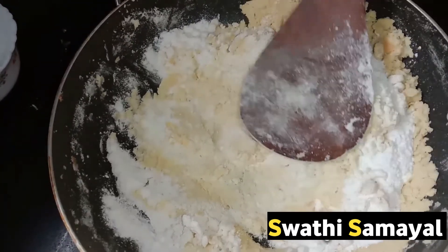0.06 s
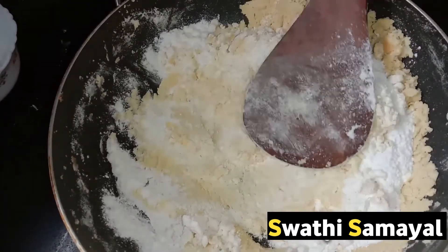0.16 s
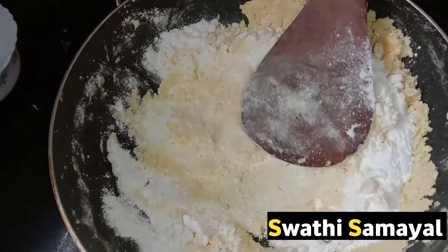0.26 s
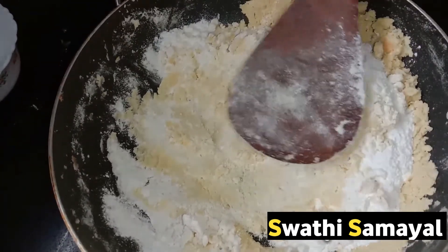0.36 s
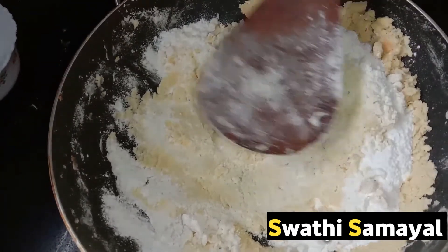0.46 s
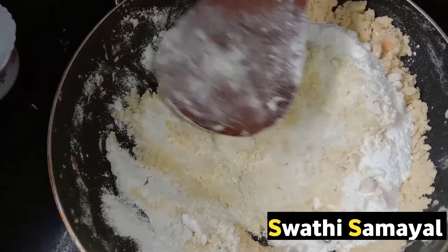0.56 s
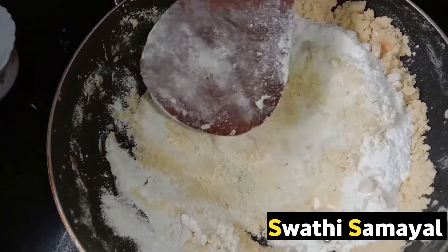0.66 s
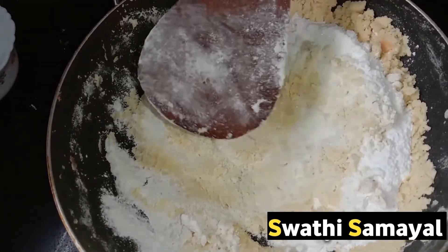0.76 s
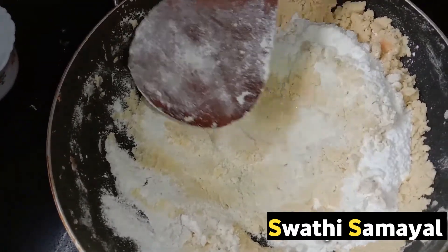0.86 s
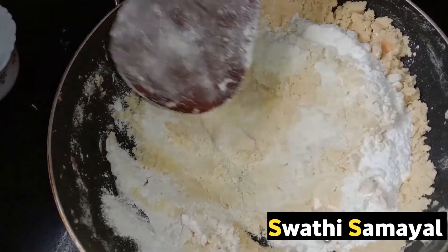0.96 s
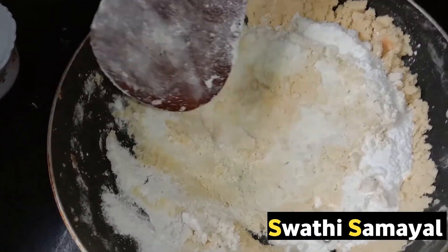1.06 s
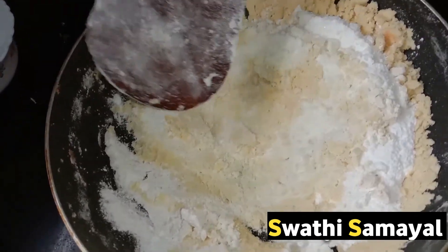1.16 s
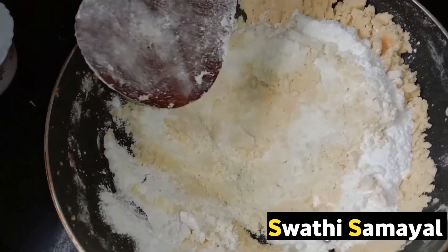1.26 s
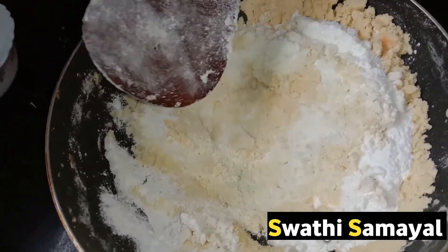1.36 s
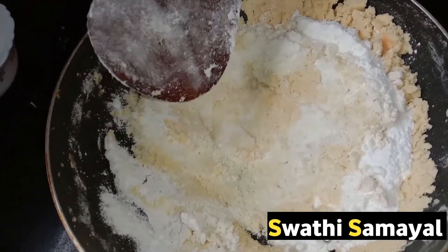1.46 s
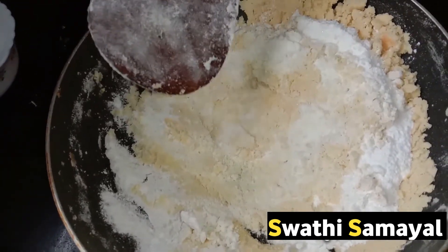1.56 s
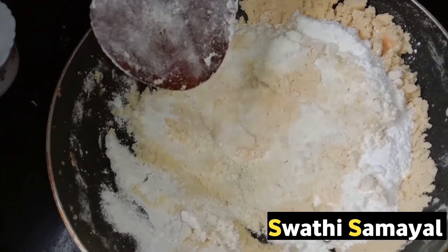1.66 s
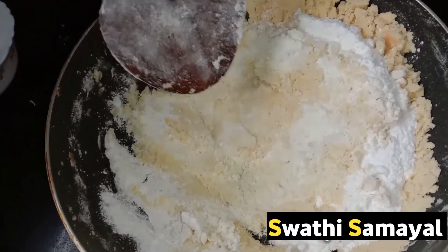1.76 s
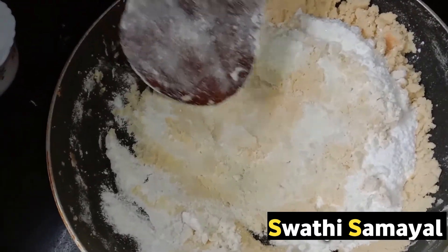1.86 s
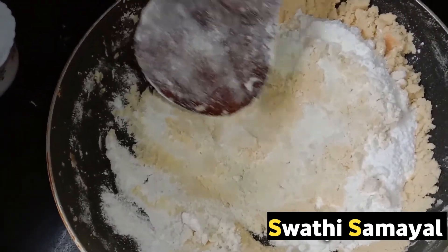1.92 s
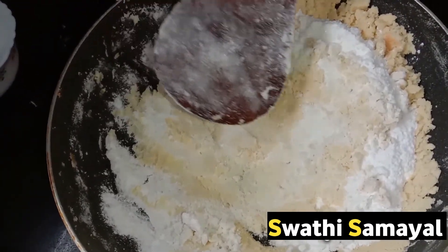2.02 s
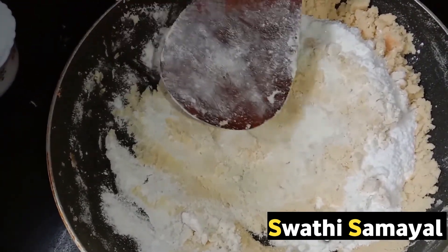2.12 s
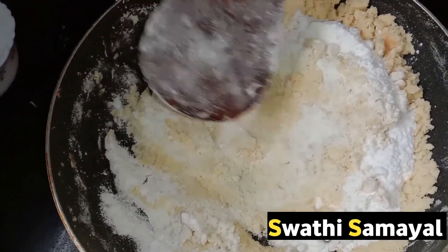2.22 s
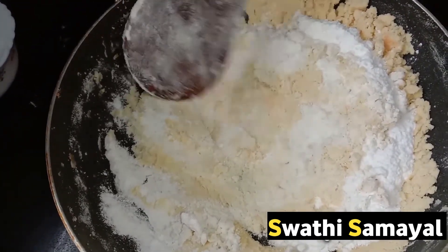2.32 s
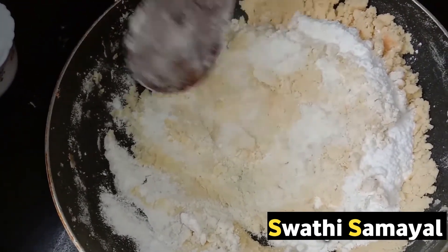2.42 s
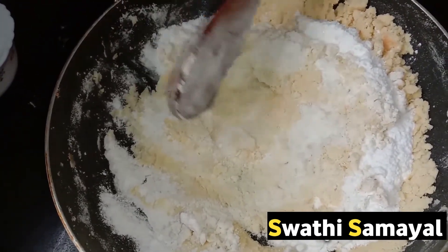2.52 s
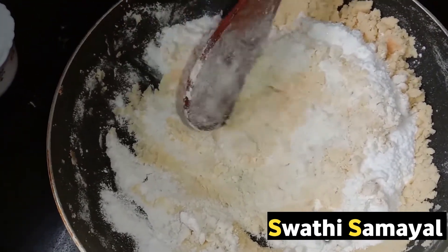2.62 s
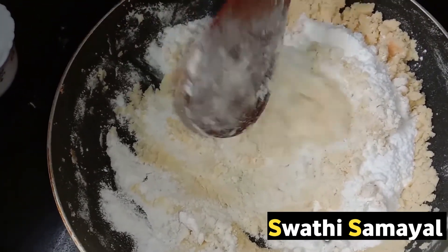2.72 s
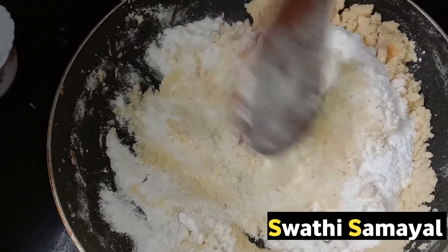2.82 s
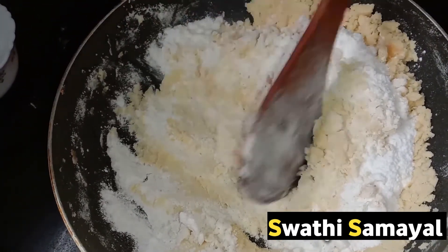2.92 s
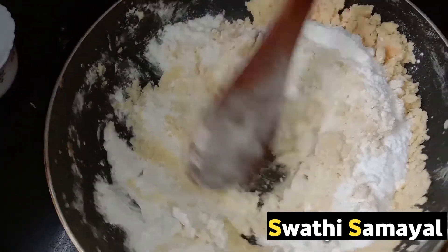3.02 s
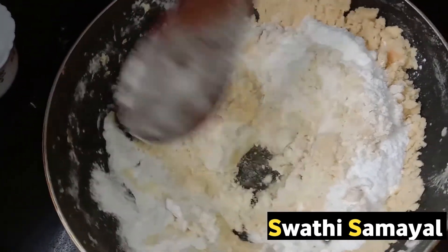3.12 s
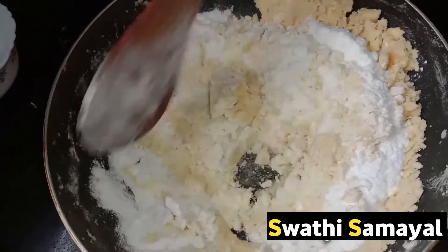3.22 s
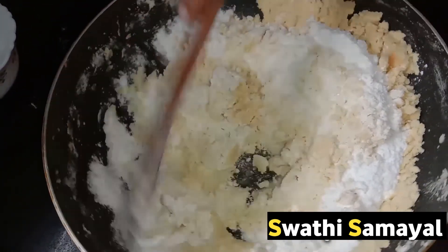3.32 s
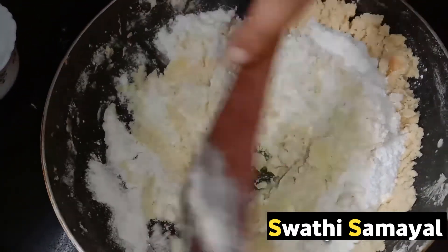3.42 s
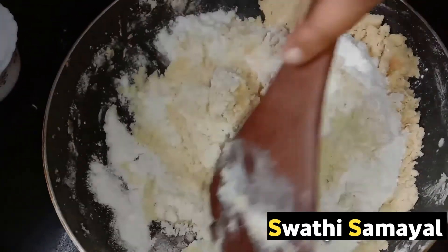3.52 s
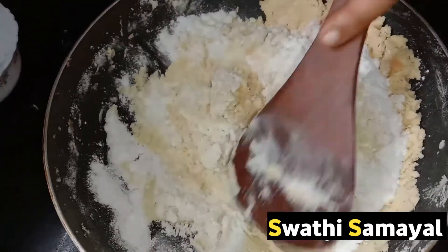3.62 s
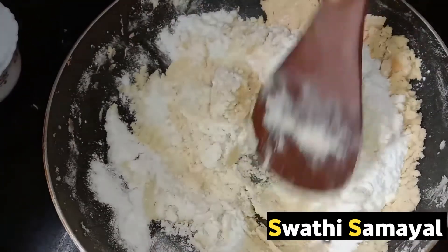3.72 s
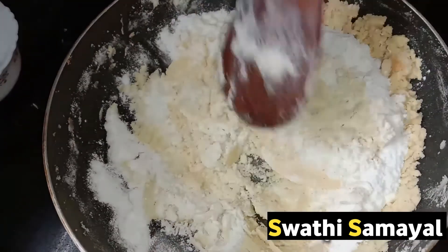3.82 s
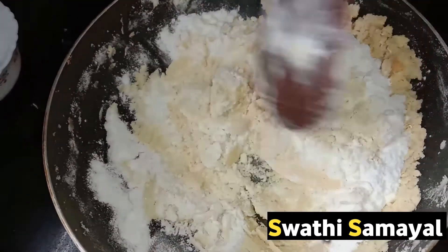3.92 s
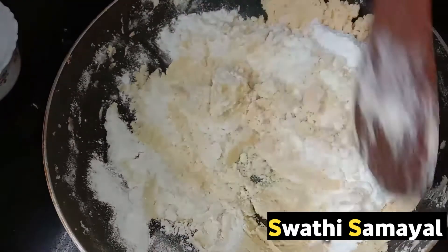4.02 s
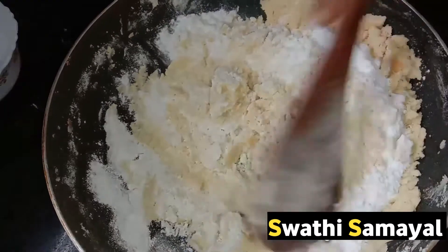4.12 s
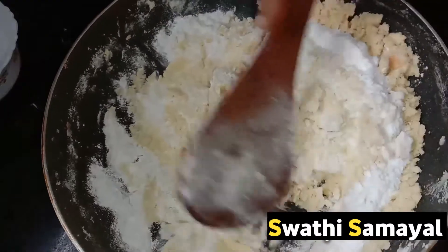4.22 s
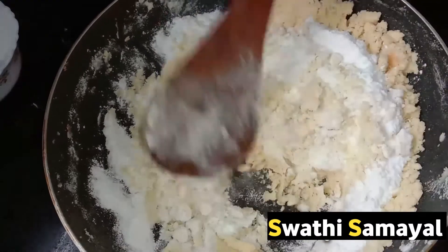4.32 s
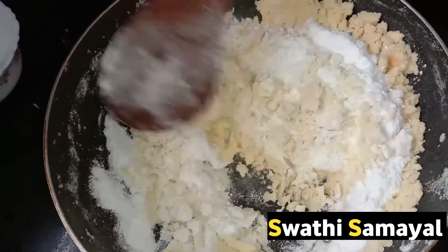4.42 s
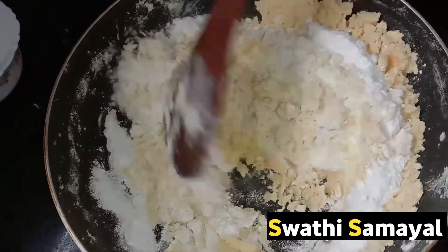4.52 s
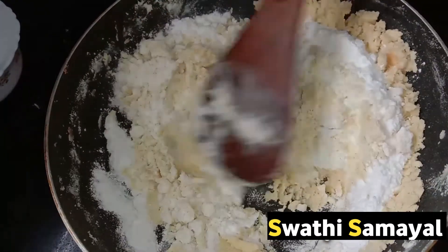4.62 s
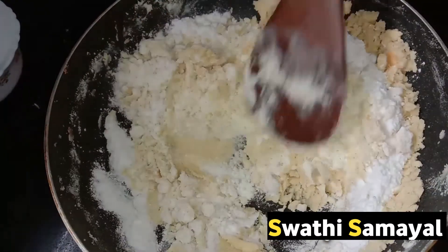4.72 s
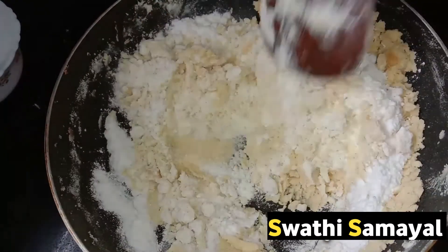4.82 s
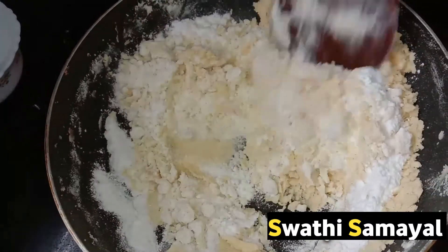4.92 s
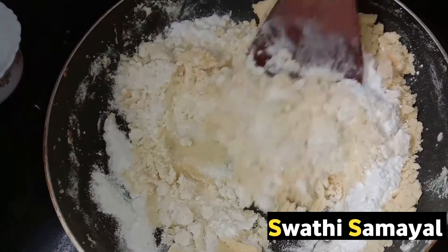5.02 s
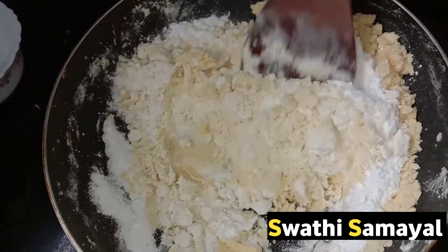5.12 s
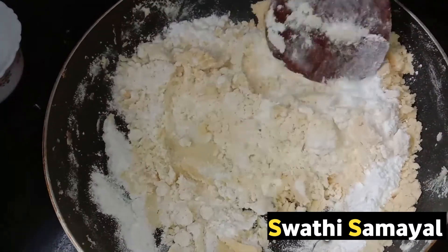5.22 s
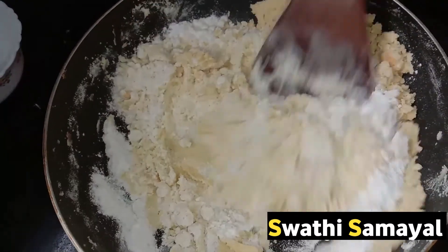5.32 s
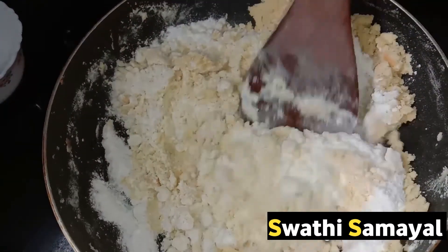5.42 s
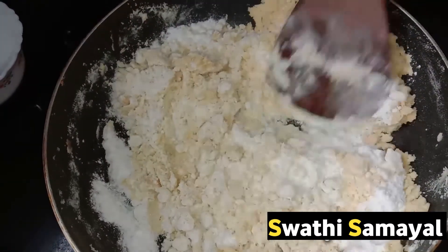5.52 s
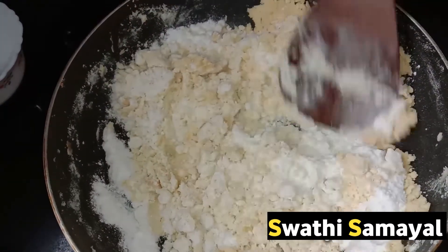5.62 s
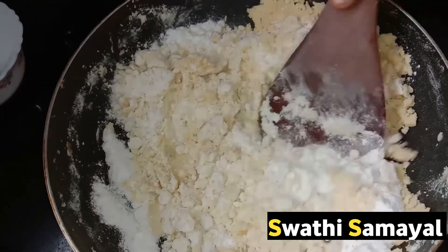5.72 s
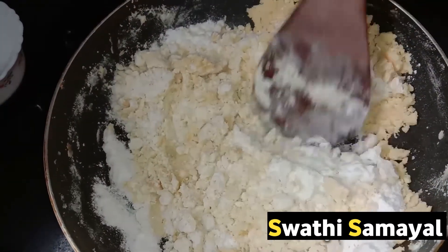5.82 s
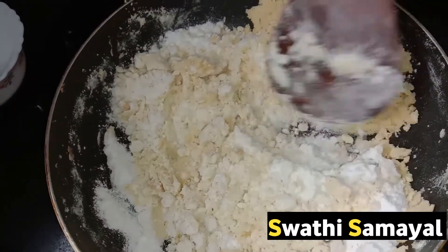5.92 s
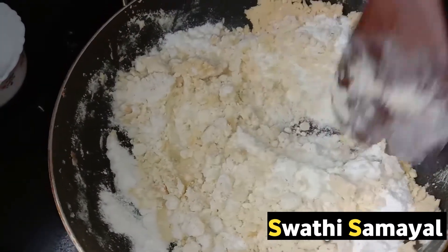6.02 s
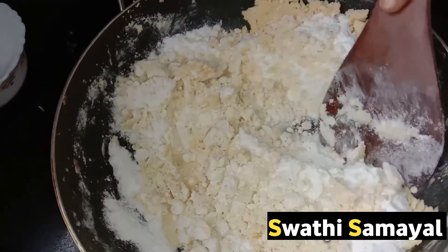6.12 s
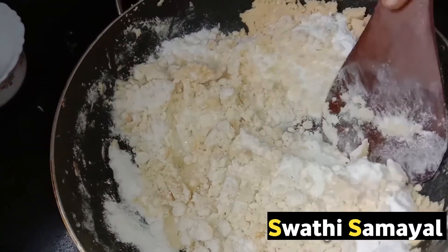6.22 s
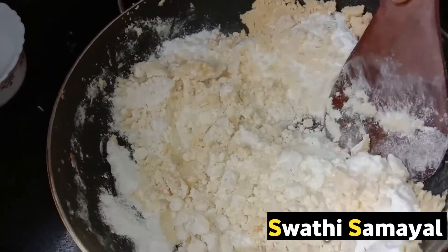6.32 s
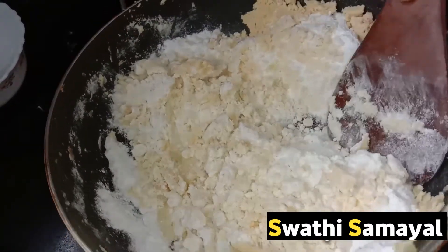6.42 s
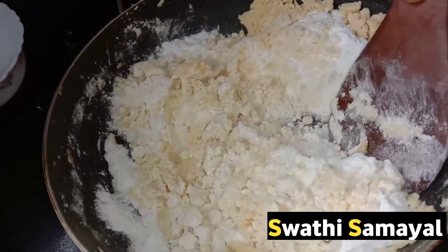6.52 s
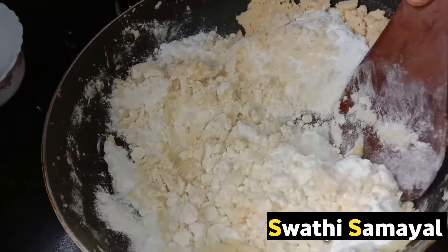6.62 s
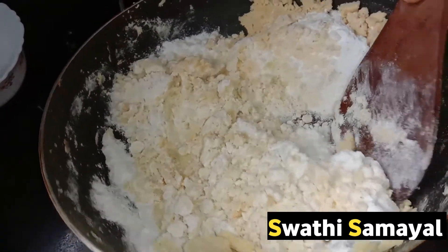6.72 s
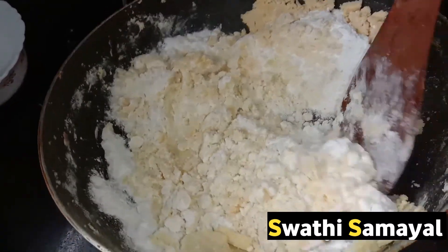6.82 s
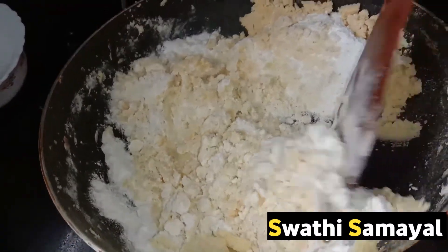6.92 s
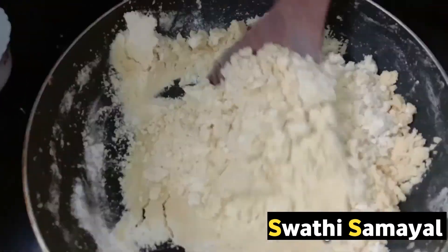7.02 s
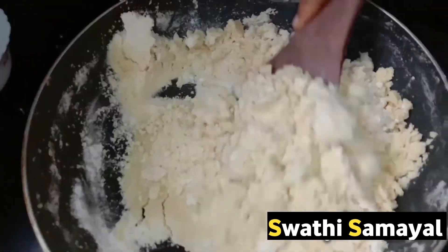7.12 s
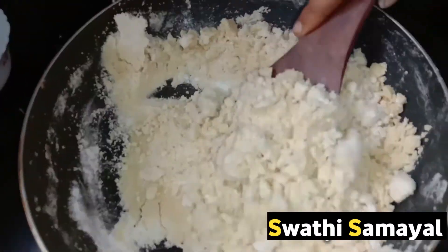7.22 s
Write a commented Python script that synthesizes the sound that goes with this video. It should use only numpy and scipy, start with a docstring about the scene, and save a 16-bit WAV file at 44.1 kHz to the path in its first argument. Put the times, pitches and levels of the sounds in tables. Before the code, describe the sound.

Close phone pickup, practically mono, with short dull kitchen echo. Muffled room noise and lumpy low thumps lead into weak wavering squeaks. Then wood scrapes gritty powder in uneven strokes, with hissing grains and damped pan knocks. A far motor drones behind. Two abrupt scrapes and a rapid volley of clacks form the peak; afterward only faint squeaks and small taps and scrapes remain.

```python
"""Small hard kitchen, phone close above a metal pan: first only filtered noise, a rumble with low thumps.
From 1.3 s faint squeaks, wavering sines in pulses; from 2.2 s a wooden spoon drags and pushes dry crumbs,
random clicks ringing hollows of spoon and pan; from 2.45 s wood knocks the pan, blows on decaying modes.
A far motor, wavering harmonics, is strongest from 4 to 5.5 s; the hardest pushes come near 5.3 and 5.6 s,
a volley of loud knocks near 6 s, then squeaks again at 6.4 s and a few last strokes."""
import sys
import numpy as np
from scipy import signal
from scipy.fft import rfft, irfft
from scipy.io import wavfile
from scipy.ndimage import map_coordinates

SR = 44100
rng = np.random.default_rng(int(sys.argv[2]) if len(sys.argv) > 2 else 0)


def generate_wav(signal):
    """Clip the signal to [-1, 1] and save it as 16-bit WAV at the path in sys.argv[1]."""
    frames = np.transpose(np.atleast_2d(signal))
    scaled = np.clip(frames, -1, 1) * 32767
    pcm = np.round(scaled).astype(np.int16)
    wavfile.write(sys.argv[1], SR, pcm)


N = 320166

# room air, far side of the kitchen: [f/Hz, density/dB per Hz]
ROOM_AIR = [(25, -22), (53, -14.5), (80, -14), (220, -18.5), (484, -32.5), (900, -26.5), (1670, -29.5),
            (1900, -26), (3600, -40), (4300, -44.5), (7300, -51), (8500, -56), (13500, -55), (15300, -53)]
ROOM_AIR_DB = -59.5  # before its bands flicker
# hollow bands of the background: [f/Hz, width/Hz, level/dB before it wavers]
HOLLOW_BANDS = [(194, 52, -66.5), (300, 56, -64), (405, 56, -72), (567, 68, -69.5), (1133, 160, -65.5),
                (1272, 100, -59.5), (1405, 61, -68.5), (2040, 100, -76), (2360, 140, -85),
                (2960, 190, -80.5), (3414, 210, -81.5)]
# level of the rumble before its random surges: [t/s, level/dB]
RUMBLE_LEVEL = [(0.0, -54), (0.7, -61.5), (1.6, -55), (2.5, -57.5), (3.3, -52), (3.6, -57.5), (4.4, -49.5),
                (5.3, -45), (5.8, -53), (6.4, -59.5), (7.26, -52.5)]
# low thumps in the rumble: [t/s, peak level/dB]
THUMPS = [(.47, -51.5), (1.042, -40.5), (1.29, -44.5), (1.18, -65), (1.6, -42.5), (1.9, -48), (2.05, -48),
          (2.129, -46), (2.32, -50), (2.53, -43.5), (2.69, -46), (3.162, -41.5), (3.42, -41), (4.33, -44),
          (4.57, -45), (4.77, -64), (5.01, -71), (5.17, -47)]
THUMP_RISE_S, THUMP_FALL_S = 0.037, 0.049  # over 20 dB
# far motor: [t/s, f/Hz of its loudest tone, level/dB before the gains of its harmonics]
MOTOR_COURSE = [(2.4, 182, -71), (3.0, 182, -59), (3.85, 184, -59), (3.95, 186, -48), (4.05, 186, -55.5),
                (4.2, 186, -42.5), (4.28, 187, -52), (4.36, 188, -45), (5.03, 189, -43.5),
                (5.09, 190, -51.5), (5.5, 190, -51), (5.9, 188, -59), (6.4, 188, -60), (7.26, 188, -62.5)]
# harmonics of the motor: [multiple of turn rate, level/dB, waver as a share of amplitude]
MOTOR_ORDERS = [(2, 3, 0.44), (3, -11, 1.24), (4, -24.5, 2.2)]
# faint thin tones, pulse by pulse: [start t/s, length/s, f/Hz, level/dB]
SQUEAK_PULSES = [(1.33, .05, 3690, -61), (1.39, .15, 3690, -63), (1.56, .06, 3690, -71),
                 (1.64, .09, 3690, -69), (1.64, .06, 3440, -68), (1.75, .12, 3430, -70),
                 (1.78, .04, 2960, -69), (1.83, .055, 2960, -65), (1.91, .085, 2960, -63),
                 (2.05, .12, 2960, -63), (2.19, .2, 2960, -65), (2.203, .2, 1990, -65),
                 (6.36, .13, 3770, -68), (6.58, .16, 3770, -67), (6.38, .28, 5900, -77),
                 (6.42, .14, 6700, -80)]
KITCHEN_T60_S, KITCHEN_DB = 0.26, -12  # echo decay, and level against the direct sound

# knocks of wood on metal: [t/s, pan ring level/dB, spoon ring level/dB, contact/ms]
KNOCKS = [(2.451, -61, -36, 0.057), (3.078, -39.5, -50, 0.11), (3.33, -32.5, -52.5, 0.13),
          (3.372, -70, -18, 0.39), (3.4445, -44, -17, 0.3), (3.4455, -23, -2, 0.22),
          (3.666, -16, -46, 1.05), (4.084, -12, -14, 0.47), (4.459, -37, -59, 0.37),
          (4.954, -8.5, -25, 1.33), (5.276, -26.5, -24, 0.1), (5.283, -26, -44, 0.073),
          (5.606, -27, -40, 0.085), (5.612, -21, -28, 0.97), (5.721, -23.5, -49.5, 0.49),
          (5.9635, -7.5, -30, 0.063), (5.9644, -4, -21, 0.078), (5.9695, -15, -27, 0.068),
          (5.9855, -13.5, -30, 0.15), (6.324, -59, -37, 0.25), (6.881, -44, -37, 0.047),
          (6.897, -47, -38, 0.045), (6.923, -42, -30.5, 0.036), (6.929, -59, -30, 0.033),
          (7.193, -60, -48, 0.081)]
# modes of the metal pan: [f/Hz, level/dB, t60/s]
PAN_MODES = [(180, -27, .15), (366, -15, .13), (520, -19, .08), (700, -6, .025), (855, -11, .05),
             (900, -8, .05), (1142, -15, .08), (1405, -11, .08), (1640, -12, .06), (1760, -7, .15),
             (1900, -4, .018), (2050, -15, .06), (2347, -15, .1), (2680, -5, .018), (2800, -9, .04),
             (2958, -1, .04), (3110, -18, .04), (3768, -8, .1), (4150, -19, .03), (4650, -25, .02),
             (5810, -20, .04), (6720, -14, .05), (7180, -24, .08)]
# modes of the wooden spoon: [f/Hz, level/dB, t60/s]
SPOON_MODES = [(807, -17, .035), (1180, -7, .022), (1276, 0, .028), (1400, -8, .02), (1550, -14, .025),
               (1840, -13, .02), (2250, -6, .012), (3010, -16, .02)]
CRACK_DB, CRACK_T60_S = 6, 0.016

# pushes through the crumbs: [t/s at full, scrape level/dB, rise/s, hold/s, fall/s,
# then rim, powder hiss and pan body, each level/dB above the scrape]; rise and fall span 20 dB
PUSHES = [(2.286, -56, 0.05, 0.0022, 0.08, -0.5, -8.5, 3), (2.404, -64, 0.067, .002, 0.058, 6.5, 3, -15),
          (2.452, -43.5, 0.02, .002, 0.027, -2.5, -6.5, -19), (2.878, -55, 0.079, 0.089, 0.1, 5.5, 2, 6.5),
          (3.1, -68, 0.019, 0.027, 0.12, 6.5, 11.5, -6), (3.26, -67, 0.018, 0.057, .1, 9, 12.5, 8),
          (3.33, -45.5, 0.0046, 0.077, 0.09, -2, 1, 15), (3.46, -46.5, 0.021, 0.005, 0.06, -9, -30, 8),
          (3.6, -56, 0.25, 0.0088, 0.09, 0.5, 4.5, 5), (3.682, -52.5, 0.065, .002, 0.11, -1.5, -3, 7.5),
          (4.05, -50, 0.068, 0.01, 0.07, 0, 4.5, 3), (4.088, -37.5, 0.02, .002, 0.051, -2, 5, 12),
          (4.15, -57, .05, 0.031, 0.13, 5.5, 6, 15.5), (4.462, -56.5, 0.042, .002, 0.077, 8, 2.5, 8),
          (4.57, -60, 0.13, 0.032, 0.074, 6.5, 5.5, -13),
          (4.385, -48.5, 0.053, 0.0085, 0.037, -11, -16, -1), (4.66, -61, 0.048, .01, 0.036, 2, -16, 7),
          (4.76, -63.5, 0.059, .01, 0.13, 2, -4, 14.5), (4.93, -44.5, 0.088, 0.011, .05, -3.5, -6, -8),
          (4.951, -32.5, 0.0097, 0.0024, 0.048, -4.5, -6.5, 3),
          (5.282, -18.5, 0.006, .003, 0.022, -25, -22, -11.5),
          (5.275, -37, 0.016, 0.061, 0.028, 3.3, -1, 1.5), (5.385, -39.5, 0.041, 0.018, 0.026, 0, -7, -2.5),
          (5.616, -15.5, 0.012, 0.0035, 0.02, -21, -24, -27),
          (5.637, -23, 0.005, .002, 0.02, -20.5, -22, -17),
          (5.297, -31, .005, 0.0017, 0.017, -20, -20, -15),
          (5.605, -29.5, 0.013, 0.056, 0.036, -4.5, -7, -3.5),
          (5.722, -43, 0.006, 0.054, 0.028, 2.5, 1.5, -0.5),
          (5.744, -33.5, 0.031, 0.018, 0.019, -2.5, -6.5, -17),
          (5.986, -29, 0.0055, 0.054, 0.072, -6, -11.5, 2.5), (6.04, -37.5, 0.035, 0.035, 0.045, -5, -8, 7),
          (6.44, -54.5, 0.38, 0.1, 0.14, -27, -10, 9), (6.871, -58, 0.029, 0.024, 0.03, 7, 3, -10),
          (6.898, -37.5, 0.0076, 0.012, 0.036, -0.5, -4, 3),
          (6.926, -44, 0.015, 0.0073, 0.055, 10, 5.5, 12), (6.939, -47, 0.034, 0.071, 0.12, 5, 3.5, 7.5),
          (7.184, -62, 0.065, .002, 0.24, 3.5, -2, -8)]
# dull drag of the spoon between the pushes: [t/s, scrape level/dB]
DRAG = [(2.15, -100), (2.3, -69), (2.75, -69.5), (3.05, -68), (3.8, -67.5), (4.0, -59.5), (4.35, -58),
        (4.8, -66), (5.1, -61), (5.25, -60.5), (5.55, -62), (5.9, -68), (6.25, -66.5), (6.8, -68.5),
        (7.26, -88)]
DRAG_RIM_DB, DRAG_HISS_DB, DRAG_BODY_DB = -2, -11.5, 7.5  # above its scrape level
# hollows at the spoon's edge: [f/Hz, width/Hz, level/dB]
EDGE_HOLLOWS = [(1660, 120, -9.5), (1778, 150, -1.5), (1885, 203, 6), (1998, 120, -5), (2330, 200, -8),
                (2890, 160, -18.5), (3632, 115, -11)]
# brighter hollows near the rim: [f/Hz, width/Hz, level/dB]
RIM_HOLLOWS = [(2205, 204, 3), (2375, 387, 8), (2682, 220, 7), (2910, 370, 6.5), (3218, 275, 5.5),
               (3484, 290, 5.5), (3780, 217, -3.5)]
# low hollows of the pan body: [f/Hz, width/Hz, level/dB]
BODY_HOLLOWS = [(328, 350, -2.5), (823, 280, -4.5), (1263, 180, 4.5), (1496, 260, -5.5)]
# lean of the hollows to their upper ends as the spoon turns: [t/s, rim/dB per octave, body/dB per octave]
LEAN = [(2.2, 5.5, -1.5), (2.9, 4.5, 1.5), (3.2, 4.5, -7.5), (3.33, -6, 2.5), (3.43, -8, 3.5),
        (3.47, -8.5, -9), (3.9, -12.5, -1.5), (4.1, 2, -1), (4.3, -17, -2.5), (4.47, -5.5, -3),
        (4.7, -18, -4.5), (4.95, 1, 0.5), (5.1, -22, -4), (5.3, 7, -1.5), (5.75, 7, -2.5), (6.0, -8, -2),
        (6.5, -15, 1.5), (6.95, -1.5, 15), (7.26, -2, 7)]
# colour of the powder hiss: [f/Hz, density/dB per Hz]
POWDER_COLOUR = [(2530, -14), (4300, -15), (5000, -10.5), (6500, -10.5), (7180, -3), (7900, -16),
                 (9000, -12), (10400, -13), (13700, -20.5), (14900, -19), (15600, -8)]
# powder's top octave and narrow ring against the rest of its hiss: [t/s, top level/dB, ring level/dB]
AIRINESS = [(2.2, 2.5, 11), (2.9, -1, -3.5), (3.1, -11, -7), (3.35, 1, -1), (4.1, -5, -4.5), (4.6, 1.5, -2),
            (5.0, -2.5, -2.5), (5.4, -1.8, -0.5), (5.75, -4, -6), (6.05, -5, -5), (6.5, 1, -2),
            (6.95, -10, 1.5), (7.26, 2, 7)]
RING_HZ, RING_WIDTH_HZ = 7120, 1450
GRIT_DB = -15  # lone hard flecks in the powder

# faint hiss, opposite in sign left and right: [f/Hz, density/dB per Hz]
SIDE_HISS = [(18, -32), (30, -20), (187, -17.5), (400, -13), (481, -11), (924, -19), (1270, -5),
             (1600, -21), (3000, -18), (15600, -36)]
SIDE_HISS_DB = -77
LOW_HZ, TOP_HZ = 66.5, 15620  # ends of the microphone's range
CEILING = .95  # full scale is 1


def undb(db):
    """Amplitude ratio of a level in dB."""
    return 10 ** (np.asarray(db) / 20)


def level(x, db):
    """Scale a signal to an RMS level in dB."""
    return x * undb(db) / np.sqrt(np.mean(x ** 2))


def noise():
    """White noise as long as the scene."""
    return rng.standard_normal(N)


def band(x, hz, width):
    """Two-pole resonance, gain 1 at the centre."""
    return signal.lfilter(*signal.iirpeak(hz, hz / width, SR), x)


def steep_band(x, hz, width):
    """Two equal resonances in a row, for steeper sides."""
    return band(band(x, hz, width), hz, width)


def colour(x, table):
    """Shape a signal by (Hz, dB) points joined on a log axis."""
    hz, db = np.transpose(table)
    f = np.maximum(np.arange(N // 2 + 1) * SR / N, 1)
    gain = undb(np.interp(np.log(f), np.log(hz), db, left=-120))
    return irfft(rfft(x) * gain, N)


def curve(table):
    """Columns of a table at every sample."""
    s, *columns = np.transpose(table)
    return [np.interp(np.arange(N) / SR, s, c) for c in columns]


def walk(rate):
    """Smooth random curve with about `rate` new values a second; spread near 1."""
    points = rng.standard_normal(4096)
    return map_coordinates(points, [np.arange(N) / SR * rate], order=3, mode="wrap")


def swell(s, db, rise, hold, fall):
    """Gain that climbs 20 dB in `rise` s to its level at s, holds, and drops 20 dB in `fall` s."""
    t = np.arange(N) / SR - s
    return undb(db + 20 * np.minimum(0, np.minimum(t / rise, (hold - t) / fall)))


def patchy(x, centres, flicker_db, rate):
    """Split into overlapping bands that each flicker alone."""
    spec, f = rfft(x), np.arange(N // 2 + 1) * SR / N
    out = 0
    for share in np.eye(len(centres)):
        part = irfft(spec * np.interp(f, centres, share), N)
        out = out + part * undb(flicker_db * walk(rate))
    return out


def room():
    """Background whose bands flicker alone, with hollow resonances and a lumpy, swelling rumble."""
    thirds = 30 * 2 ** np.arange(0, 9.3, 1 / 3)  # third-octave centres, Hz
    air = patchy(level(colour(noise(), ROOM_AIR), ROOM_AIR_DB), thirds, flicker_db=1.7, rate=14)
    flutter_db, surge_db = 2.0, 1.8
    hollow = 0
    for hz, width, db in HOLLOW_BANDS:
        waver = undb(flutter_db * walk(14) + surge_db * walk(3.92))
        hollow = hollow + level(steep_band(noise(), hz, width), db) * waver
    rumble = level(steep_band(noise(), 108, 48), 0)
    surge = undb(curve(RUMBLE_LEVEL)[0] + surge_db * walk(8))
    thumps = sum(swell(s, db, THUMP_RISE_S, 0, THUMP_FALL_S) for s, db in THUMPS)
    return air + hollow + rumble * (surge + thumps)


def motor():
    """A far motor: harmonics of its turn rate, blurred on their way through the walls."""
    hz, db = curve(MOTOR_COURSE)
    # the listed tone is the second harmonic, so the turn rate is half of it
    turn = np.cumsum(np.pi * hz * (1 + .005 * walk(5)) / SR)
    tones = 0
    for k, order_db, waver in MOTOR_ORDERS:
        in_phase = (1 + waver * walk(45)) * np.sin(k * turn)
        across = waver * walk(45) * np.cos(k * turn)
        tones = tones + undb(order_db) * (in_phase + across)
    return undb(db) * tones


def squeaks():
    """Thin high tones that come in broken pulses, waver in pitch and fade into a faint trail."""
    t, out = np.arange(N) / SR, 0
    for s, length, hz, db in SQUEAK_PULSES:
        gate = swell(s + .015, db, .03, .6 * length, .6 * length)
        waver = 1.1 * walk(90) + 2 * walk(12)  # phase, radians
        out = out + gate * (1 + .35 * walk(40)) * np.sin(2 * np.pi * hz * t + waver)
    return out


def kitchen(x):
    """Diffuse echo of tiled walls, duller than the direct sound."""
    t = np.arange(SR // 2) / SR
    fade = np.exp(-np.log(1000) * t / KITCHEN_T60_S)
    tail = rng.standard_normal(len(t)) * fade * np.minimum(t / 0.006, 1)
    tail = signal.lfilter([1], [1, -.5], tail)  # tilt away from the treble
    return signal.fftconvolve(x, tail * undb(KITCHEN_DB) / np.linalg.norm(tail))[:N]


def ring(modes, spread_db):
    """Response of a body to one blow; each spot drives the modes differently."""
    t = np.arange(SR // 3) / SR
    hz, db, t60 = np.transpose(modes)[:, :, None]
    sign = (-1) ** np.arange(len(hz))[:, None]
    gain = undb(db + spread_db * rng.uniform(-0.82, 1, hz.shape)) * sign
    fade = np.exp(-np.log(1000) * t / t60)
    y = np.sum(gain * np.sin(2 * np.pi * hz * t) * fade, axis=0)
    return y / np.sqrt(np.sum(undb(2 * db)))


def knocks():
    """Wood on metal: a longer contact is a softer push and rings less treble."""
    out = np.zeros(N + SR)
    for s, pan_db, spoon_db, contact_ms in KNOCKS:
        t = np.arange(256) / SR * 1000 / contact_ms  # in contact times
        push = t * np.exp(-2 * t)
        pan = undb(pan_db) * ring(PAN_MODES, spread_db=2.)
        body = pan + undb(spoon_db) * ring(SPOON_MODES, spread_db=1.5)
        # the many modes too short-lived to tell apart: a burst of noise
        fade = np.exp(-np.log(1000) * np.arange(len(body)) / SR / CRACK_T60_S)
        crack_gain = undb(CRACK_DB) * np.hypot(undb(pan_db), undb(spoon_db - 21.0))
        crack = band(rng.standard_normal(len(body)), 3200, 1850) * fade * crack_gain
        blow = signal.fftconvolve(body + crack, push / push.sum())
        i = int(s * SR)
        out[i:i + len(blow)] += blow
    # the knocks carry no deep bass
    return signal.sosfilt(signal.butter(2, 220, "highpass", fs=SR, output="sos"), out[:N])


def grains(rate, spread_db):
    """Dense random clicks, `rate` a second, a few much larger than the rest."""
    hits = rng.random(N) < rate / SR
    return hits * noise() * undb(spread_db * rng.exponential(size=N))


def hollows(x, modes, lean_db=0, drift_db=1.8, rate=20):
    """Steep resonances whose shares drift, and lean about the middle one, as the spoon turns."""
    middle = modes[len(modes) // 2][0]
    out = 0
    for hz, width, db in modes:
        share_db = db + lean_db * np.log2(hz / middle) + drift_db * walk(rate)
        out = out + undb(share_db) * level(steep_band(x, hz, width), 0)
    return out


def stirring():
    """Gains of edge, rim, powder and pan body: the drag and all pushes, added in power."""
    gains = np.array([undb(curve(DRAG)[0])] + [swell(*push[:5]) for push in PUSHES])
    drag_db = (0.004, DRAG_RIM_DB, DRAG_HISS_DB, DRAG_BODY_DB)
    above_db = [drag_db] + [(0, *push[5:]) for push in PUSHES]
    return np.sqrt(undb(above_db).T ** 2 @ gains ** 2)


def powder_hiss():
    """Fine powder hisses in patches and lone hard flecks crackle; top and narrow ring vary with time."""
    bands = np.arange(4, 16.5, .75) * 1000  # Hz
    powder = colour(grains(rate=7000, spread_db=1.7), POWDER_COLOUR)
    uneven = undb(0.69 * walk(60))  # the crumbs give way unevenly
    hiss = level(patchy(powder, bands, flicker_db=2.0, rate=22) * uneven, -1.76)
    flecks = colour(grains(rate=400, spread_db=2), POWDER_COLOUR)
    hiss = hiss + level(patchy(flecks, bands[::3], flicker_db=6, rate=250), GRIT_DB)
    top = colour(hiss, [(1, -60), (7500, -60), (9500, 0), (20000, 0)])
    narrow = band(hiss, RING_HZ, RING_WIDTH_HZ)
    top_db, ring_db = curve(AIRINESS)
    return hiss + (undb(top_db) - 1) * top + (undb(ring_db) - 1) * narrow


def scrape():
    """Crumbs break under the edge and ring its hollows and the pan, amid the hiss of powder."""
    at_edge, at_rim, at_powder, at_body = stirring()
    crumbs = grains(rate=3000, spread_db=2.2)
    thuds = grains(rate=4000, spread_db=1.5)
    rim_lean, body_lean = curve(LEAN)
    judder = undb(2.0 * walk(70))  # the edge catches and slips
    pan = signal.fftconvolve(np.diff(crumbs, prepend=0), ring(PAN_MODES, spread_db=4))[:N]
    edge = level(hollows(crumbs, EDGE_HOLLOWS, drift_db=3.5), -1.8) + level(pan, -21)
    rim = level(hollows(crumbs, RIM_HOLLOWS, rim_lean), -1.0)
    body = level(hollows(thuds, BODY_HOLLOWS, body_lean), -5.5)
    return judder * (at_edge * edge + at_rim * rim + at_body * body) + at_powder * powder_hiss()


def scene():
    """Background, motor and squeaks behind the close spoon and its echo, alike in both channels."""
    spoon = scrape() + knocks()
    mid = room() + motor() + squeaks() + kitchen(spoon) + spoon
    return np.array([mid, mid])


def record(dry):
    """The phone drops deep bass, rounds the loudest peak and cuts the top. A faint hiss, opposite in sign left
    and right, lies under it all."""
    thin = signal.sosfilt(signal.butter(2, LOW_HZ, "highpass", fs=SR, output="sos"), dry)
    rounded = CEILING * np.tanh(thin / CEILING)
    hiss = level(colour(noise(), SIDE_HISS), SIDE_HISS_DB) * np.array([[1], [-1]])
    top_cut = signal.ellip(12, .2, 90, TOP_HZ, fs=SR, output="sos")
    return signal.sosfilt(top_cut, rounded + hiss)


dry = scene()
out = record(dry)
generate_wav(out)
```